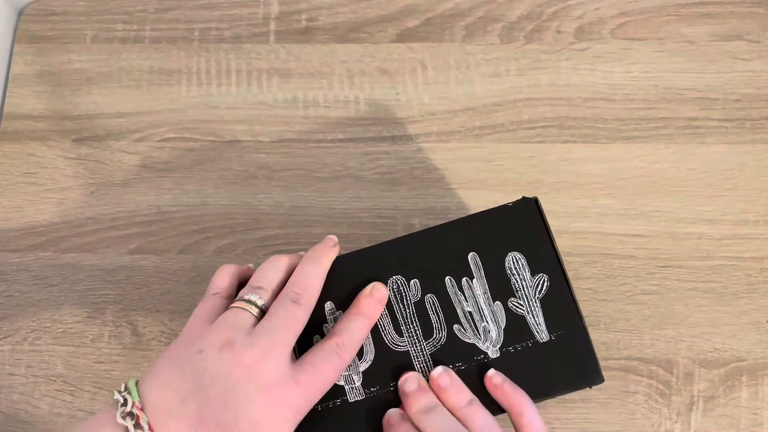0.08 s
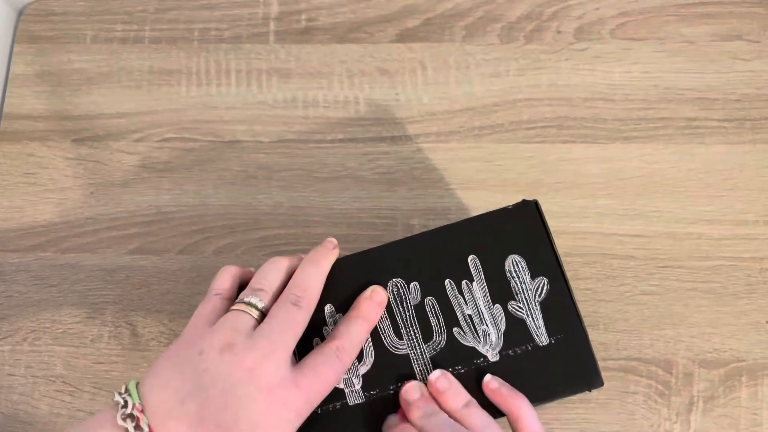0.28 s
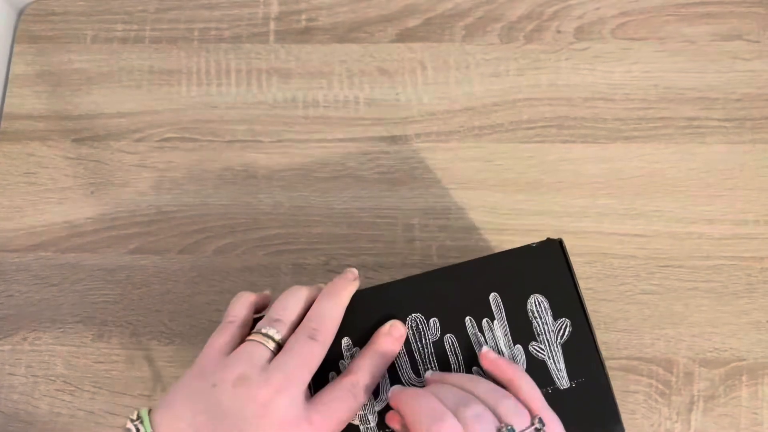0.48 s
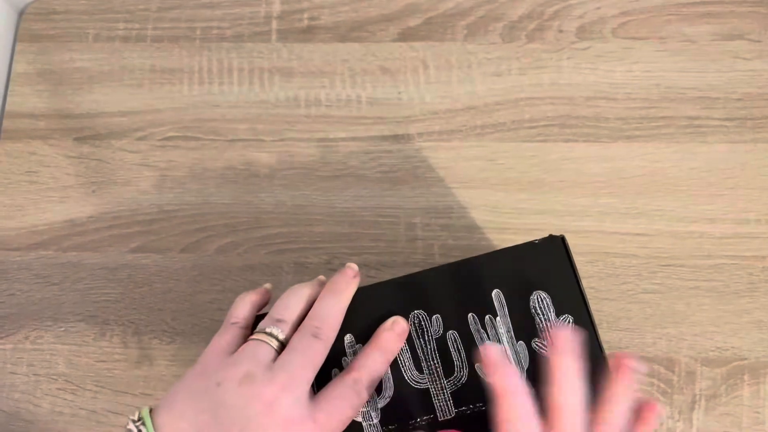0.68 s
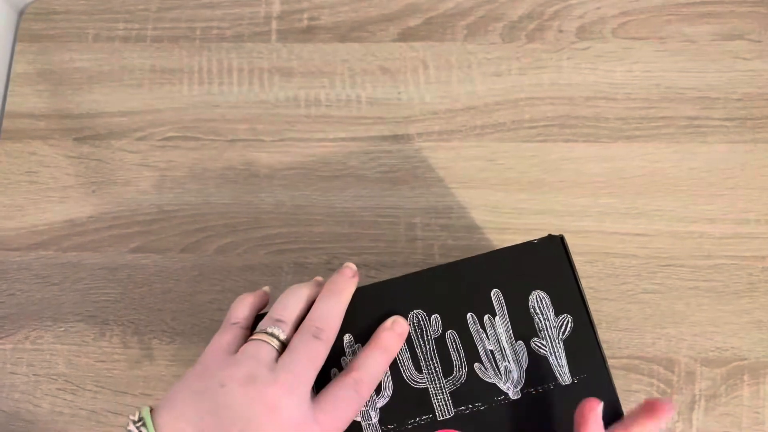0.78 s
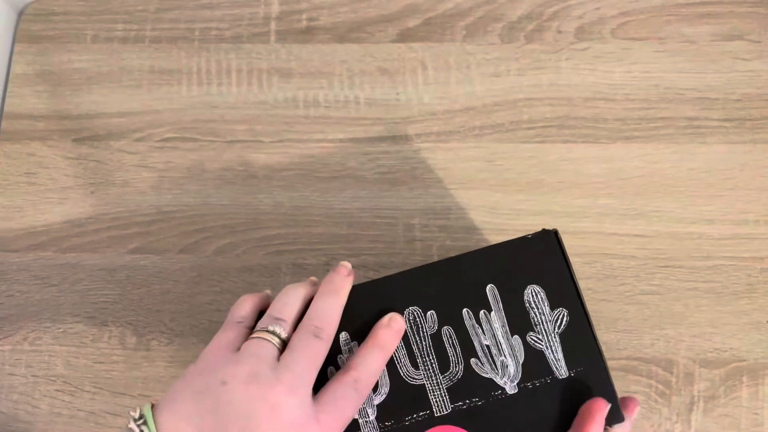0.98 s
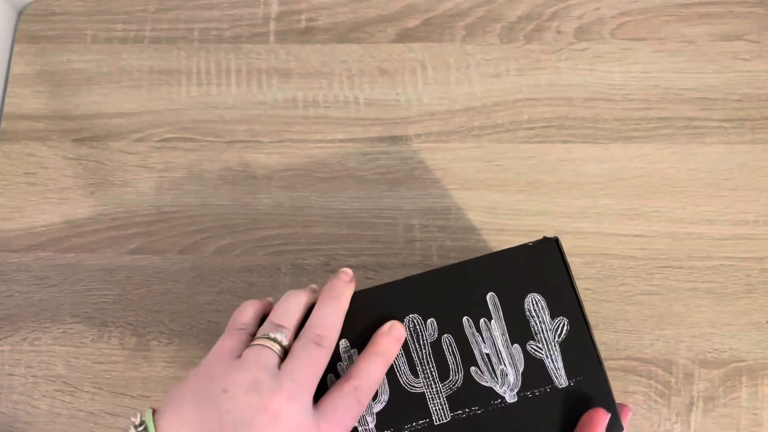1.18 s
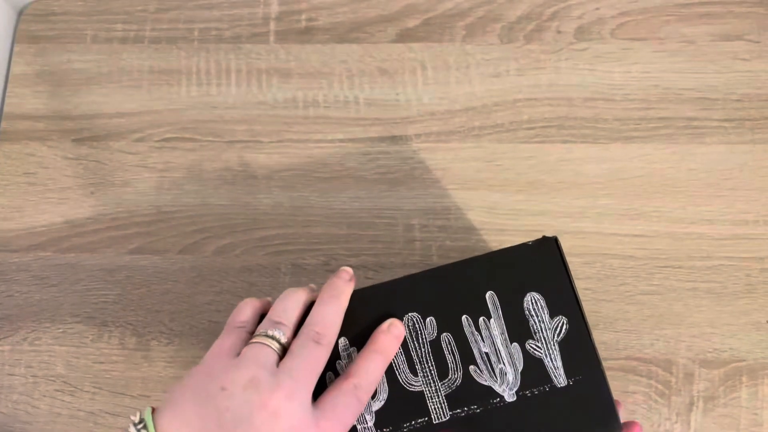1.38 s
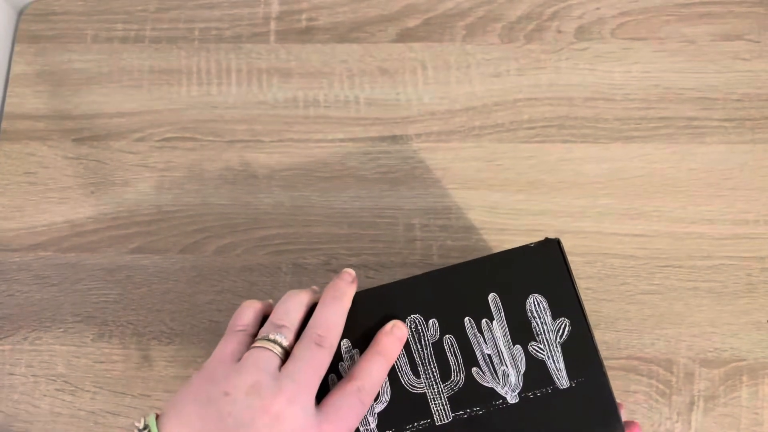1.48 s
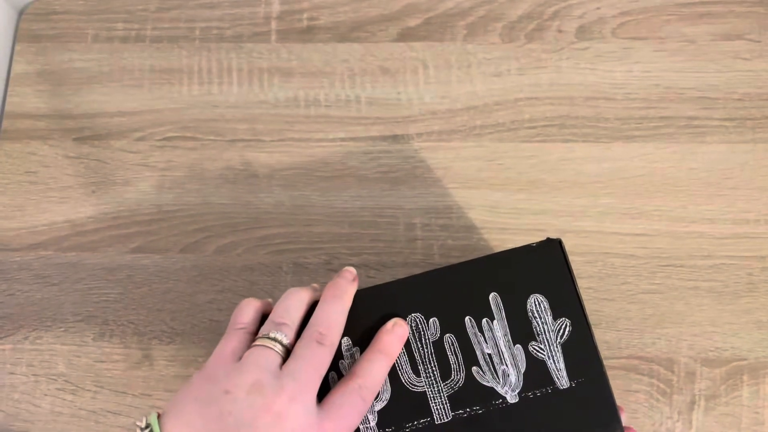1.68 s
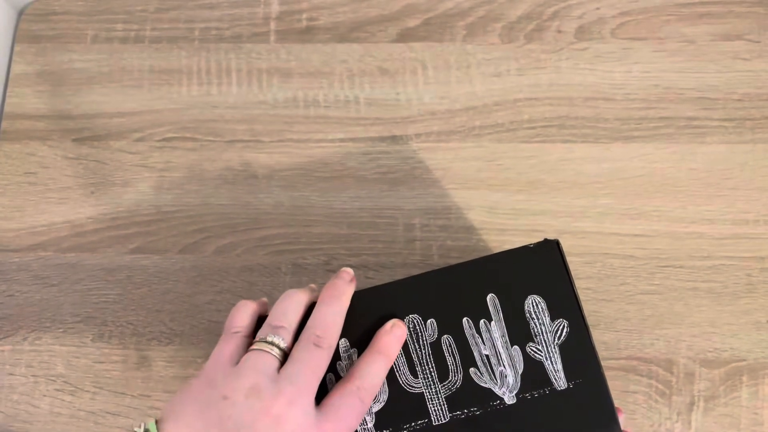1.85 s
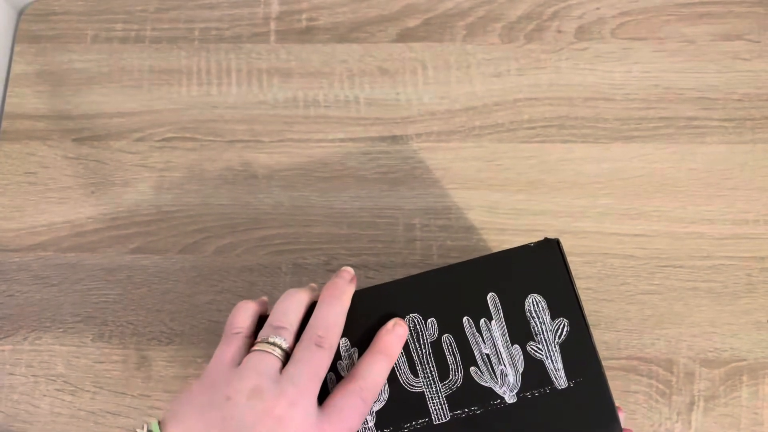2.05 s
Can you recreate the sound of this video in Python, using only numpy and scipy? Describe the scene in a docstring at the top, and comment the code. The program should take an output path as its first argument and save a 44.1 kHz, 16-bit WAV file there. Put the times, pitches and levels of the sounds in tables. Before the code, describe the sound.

Close up in a small room, a cardboard box lands on a wooden table with a single hollow thump. A softer bump and brief finger rubbing follow, then quiet runs of small snaps as a fingernail picks at a sticker.

```python
"""A small room, close to a wooden table where a hand shifts a cardboard box.
The box scuffs, drops with one thump and is bumped as the grip changes; box and table ring together.
Fingers slide over the card, then a nail picks at the sticker seal in runs of small snaps that ring
the hollow box. A close pair of microphone ports hears it over low room noise."""
import sys
import numpy as np
from scipy import signal
from scipy.fft import rfft, irfft, next_fast_len
from scipy.io import wavfile
from scipy.ndimage import map_coordinates

SR = 44100
rng = np.random.default_rng(int(sys.argv[2]) if len(sys.argv) > 2 else 0)


def dump(signal):
    """Clip the signal to [-1, 1] and save it as 16-bit WAV at the path in sys.argv[1]."""
    limited = np.clip(np.atleast_2d(signal).T, -1, 1)
    pcm = np.round(limited * 32767).astype(np.int16)
    wavfile.write(sys.argv[1], SR, pcm)


N = 92610

# The box lands and rattles: start_s, table_db, box_db, crack_db, sway_db
DROP_HITS = [(0.241, -17.5, -20.5, -15.5, -33), (.2478, -14.5, -25.5, -44, -27),
             (.2525, -38.5, -25.5, -36.5, -44.5), (.2600, -27.5, -31, -28.5, -48),
             (.2650, -48.5, -37, -31, -57.5)]
# Colour of the edge's crack: freq_hz, level_db
CRACK_EQ = [(150, -32), (600, -18), (790, 3), (900, -8.5), (1080, 8.5), (1500, 10), (1750, -10),
            (2100, -0.5), (2700, -14.5), (4500, -19), (8000, -19), (16000, -30.5)]
# Ring of the hollow box and of the table top: pitch_hz, level_db, t60_s
BOX_MODES = [(222.2, -5.5, 0.13), (297.6, -3.5, 0.18), (355.7, 1, 0.15), (415, -4.5, .05),
             (470.2, 1, 0.097), (511, -2.5, .08), (558.6, -4.5, 0.11), (621, -4.5, 0.091),
             (671.5, -2, 0.12), (778, -2, 0.098), (1010, -4, .035), (1161, -11.5, 0.025), (1400, -21, .045)]
TABLE_MODES = [(112.6, -1.5, 0.13), (146.9, 6.5, .15), (177.4, 7, 0.12), (188, -9.5, 0.38)]

def box_drop():
    """The box's edge cracks on the table, then its weight lands and the card rattles."""
    out = np.zeros(N)
    knock, boom = ring(TABLE_MODES, rise_s=.001, varied=False), table_sway()
    for start_s, table_db, box_db, crack_db, sway_db in DROP_HITS:
        add(out, start_s, amp(crack_db) * burst(CRACK_EQ, decay_s=.0031, grit=2.9))
        add(out, start_s, amp(box_db) * ring(BOX_MODES, rise_s=.00056))
        add(out, start_s, amp(table_db) * knock)
        add(out, start_s, amp(sway_db) * boom)
    return out

# The nail taps, catches and slips: start_s, box_db, snap_db, tick_db, fizz_db
NAIL_PICKS = [(0.0066, -51.5, -51, -49.5, -59), (0.0535, -60, -64, -79, -78),
              (0.1268, -50, -53.5, -56, -75.5), (0.144, -46.5, -63.5, -55, -71.5),
              (0.15, -44, -35.5, -40, -51.5), (0.1855, -40, -33, -29.5, -29.5),
              (0.1864, -31.5, -39.5, -45.5, -38.5), (0.2173, -41, -33, -50.5, -35.5),
              (0.4541, -50.5, -48, -63, -53.5), (0.5813, -68.5, -64.5, -60, -59),
              (0.5902, -78, -79, -61.5, -53), (0.6695, -60, -53, -71, -65),
              (0.6963, -63, -73, -55.5, -56.5), (0.7906, -49.5, -77, -40.5, -65.5),
              (0.8609, -60.5, -73, -78.5, -66), (0.8847, -56.5, -58.5, -77, -79),
              (0.9718, -48.5, -56.5, -60.5, -66.5), (1.009, -52.5, -62.5, -49, -73),
              (1.0408, -50, -68, -54.5, -68), (1.0689, -51.5, -73, -60.5, -74.5),
              (1.0991, -51, -62, -66, -72), (1.1211, -48.5, -59.5, -64, -73.5),
              (1.1674, -49, -55, -65, -72.5), (1.1838, -45.5, -61, -108, -64),
              (1.217, -59.5, -74, -80, -62.5), (1.2593, -51.5, -49.5, -64, -71.5),
              (1.337, -45, -54.5, -64, -74), (1.3517, -43.5, -53.5, -59, -71.5),
              (1.3663, -41, -50.5, -76, -69), (1.3797, -41.5, -53.5, -67.5, -78),
              (1.3953, -41.5, -56.5, -59, -76.5), (1.4144, -39.5, -37, -50, -62.5),
              (1.4328, -38, -44.5, -43, -59), (1.4574, -38.5, -45, -53, -59.5),
              (1.4911, -49, -40, -50, -56.5), (1.4953, -37.5, -64, -47.5, -73.5),
              (1.5362, -47.5, -55.5, -73, -65.5), (1.5505, -40.5, -45.5, -56.5, -70.5),
              (1.5782, -42, -47, -64, -65.5), (1.6012, -39, -49, -59.5, -74),
              (1.661, -57.5, -68, -91, -100), (1.7266, -45.5, -54.5, -64, -67),
              (1.7443, -45.5, -57.5, -66, -64.5), (1.761, -50, -67, -57.5, -67.5),
              (1.7648, -46.5, -53, -69, -67), (1.7868, -51, -58, -70, -70),
              (1.8668, -59.5, -71, -79.5, -78), (1.9237, -46, -41.5, -58, -88)]
# Colours of the mid snap, bright tick and top fizz: freq_hz, level_db
SNAP_EQ = [(200, -10.5), (600, -4.5), (920, -4), (1180, 6.5), (1500, -0.5), (1760, -7), (2080, 1.5),
           (2480, -21.5), (2720, -6), (3050, -10), (5000, -33), (16000, -54.5)]
TICK_EQ = [(500, -15), (2000, -3), (2750, 4.5), (3000, -5), (3500, 1), (4300, 2), (4750, -14.5),
           (5500, -3.5), (8000, -11), (11000, -10), (16000, -42)]
FIZZ_EQ = [(2000, -33.5), (7000, -7), (10000, -4), (13500, 6), (16000, -3)]

def nail_picking():
    """Each slip of the nail snaps, ticks and rings the box and a little of the table."""
    out = np.zeros(N)
    for start_s, box_db, snap_db, tick_db, fizz_db in NAIL_PICKS:
        add(out, start_s, amp(snap_db) * burst(SNAP_EQ, decay_s=.0013))
        add(out, start_s, amp(tick_db) * burst(TICK_EQ, decay_s=.0032))
        add(out, start_s, amp(fizz_db) * burst(FIZZ_EQ, decay_s=.0032))
        add(out, start_s, amp(box_db) * ring(BOX_MODES, rise_s=.00024))
        add(out, start_s, amp(box_db - 7.5) * ring(TABLE_MODES, rise_s=.0028))
    return out

# Soft thuds as the grip changes: start_s, table_db, box_db, sway_db
GRIP_BUMPS = [(.008, -51, -50.5, -51.5), (.189, -35, -39, -31.5), (0.2, -44, -39.5, -57),
              (.325, -41, -46.5, -32), (0.424, -40, -36.5, -50), (0.4363, -23.5, -39.5, -26.5),
              (0.466, -37.5, -40, -41), (.487, -32.5, -62, -27), (.523, -35.5, -63, -29),
              (0.545, -40.5, -85, -37.5), (.612, -49.5, -83, -37.5), (0.661, -56.5, -59, -64),
              (0.71, -71.5, -87, -41.5), (.790, -46.5, -53, -48), (1.268, -47.5, -52.5, -59),
              (1.297, -74, -53.5, -72), (1.791, -49.5, -46.5, -49.5), (1.974, -60, -76.5, -56.5)]

def fingertip_bumps(rise_s=.0059):
    """Fingertips press the box against the table: only the low modes answer."""
    out = np.zeros(N)
    thud, boom = ring(TABLE_MODES, rise_s, cutoff_hz=169.4, varied=False), table_sway()
    for start_s, table_db, box_db, sway_db in GRIP_BUMPS:
        add(out, start_s, amp(box_db) * ring(BOX_MODES, rise_s, cutoff_hz=378))
        add(out, start_s, amp(table_db) * thud)
        add(out, start_s, amp(sway_db) * boom)
    return out

# The table's bass weight: pitch_hz, level_db, t60_s
SWAY_MODES = [(47.5, -10, 0.083), (65.55, -1, 0.19)]

def table_sway():
    """The whole table sways with a deep boom, peak 1."""
    boom = ring(SWAY_MODES, rise_s=.011, varied=False)
    return boom / np.abs(boom).max()

# Skin dragging on card: start_s, length_s, rub_db, hiss_db
SKIN_SLIDES = [(.004, 0.004, -49.5, -51.5), (.160, 0.037, -45, -47.5), (0.179, 0.009, -54, -43),
               (0.193, 0.045, -43.5, -42), (0.23, 0.038, -32.5, -43.5), (0.274, 0.038, -41, -46.5),
               (0.292, 0.01, -57.5, -61), (0.362, 0.066, -43.5, -49.5), (0.438, 0.022, -60, -59),
               (0.508, 0.034, -65, -66), (0.54, .028, -55, -58), (0.637, 0.017, -68, -55),
               (0.668, 0.031, -67, -59), (0.693, 0.023, -60, -54.5), (0.774, 0.018, -55.5, -54),
               (0.793, 0.011, -52.5, -62), (.83, 0.11, -71.5, -79), (0.95, 0.053, -62.5, -70.5),
               (1.024, 0.033, -64.5, -63), (1.052, 0.097, -71, -72), (1.131, 0.098, -70, -68.5),
               (1.255, 0.042, -65.5, -69), (1.351, 0.24, -67.5, -76.5)]
# Light brushes over the smooth coating: start_s, length_s, level_db
COATING_BRUSHES = [(0.283, 0.014, -46), (0.526, 0.041, -51.5), (0.687, 0.017, -64), (1.189, 0.028, -60.5)]
# Colours of the slide's body and its hiss: freq_hz, level_db
RUB_EQ = [(80, -28), (350, 10), (800, -2), (1400, 4), (2100, 2), (2800, -2.5), (4200, -19), (6000, -20),
          (16000, -49.5)]
HISS_EQ = [(500, -26), (2000, -23.5), (4000, 6), (4900, 1), (6500, 0), (8000, 3), (11000, 1), (14000, 2.5),
           (16000, -9.5)]

def finger_slides(grain_db=1, grains_per_s=450):
    """Skin drags over the card in short strokes, grainy with tiny slips."""
    rub, hiss = sum(amp([[rub_db], [hiss_db]]) * stroke(start_s, length_s)
                    for start_s, length_s, rub_db, hiss_db in SKIN_SLIDES)
    brush = sum(amp(db) * stroke(start_s, length_s) for start_s, length_s, db in COATING_BRUSHES)
    slips = map_coordinates(rng.standard_normal(N // 8), [np.arange(N) / SR * grains_per_s])
    grain = unit_rms(amp(grain_db * slips))
    return grain * (rub * noise(RUB_EQ) + hiss * noise(HISS_EQ)) + brush * noise(FIZZ_EQ)

def stroke(start_s, length_s, rise_s=.01, fall_s=.0046):
    """Envelope of a finger that lands, slides for a while and lifts."""
    t = np.arange(N) / SR - start_s
    landing = np.clip(t / min(rise_s, length_s / 2), 0, 1)
    return landing * np.exp(-np.maximum(t - length_s, 0) / fall_s)

# Reverb decay: freq_hz, t60_s
REVERB_DECAY = [(60, 0.99), (300, 0.33), (1000, 0.18), (4000, 0.18), (9000, 0.42), (16000, 0.29)]
# Reverb send, and the width of its return: freq_hz, level_db
SEND_EQ = [(60, -15), (150, -23.5), (300, -18), (1000, -7), (4000, -7.5), (16000, -17.5)]
SIDE_EQ = [(60, -20), (150, -12), (400, 4.5), (1500, -3.5), (5000, 3), (10000, -8.5), (16000, -5)]

def room_reverb(x):
    """The room's answer: a short tail, centred in the bass and wider above."""
    hz, t, spectra = signal.stft(rng.standard_normal((2, SR // 2)), SR, nperseg=256)
    decay = amp(-60 * t / curve(REVERB_DECAY, hz)[:, None])
    tail = signal.istft(spectra * decay, SR, nperseg=256)[1]
    tail = np.pad(tail / np.linalg.norm(tail[0]), ((0, 0), (SR // 250, 0)))  # 4 ms pre-delay
    mid, side = signal.fftconvolve(equalise(x, SEND_EQ)[None], tail, axes=1)[:, :N]
    side = equalise(side, SIDE_EQ)
    return np.array([mid + side, mid - side])

# The room's low noise bed: freq_hz, level_db
AIR_EQ = [(20, -20.5), (35, -1), (52, 4.5), (90, -9), (150, 7), (220, -4), (400, -23), (1000, -31),
          (3000, -39.5), (8000, -50.5), (16000, -62.5)]

def room_tone(air_db=-59, hum_db=-75.5, hum_hz=858):
    """Low room noise with a faint steady tone."""
    return amp(air_db) * noise(AIR_EQ) + amp(hum_db) * np.sin(2 * np.pi * hum_hz * np.arange(N) / SR)

def burst(eq, decay_s, grit=.51, size=2048):
    """A sharp push with a gritty tail, carrying the energy of 5 ms at rms 1."""
    force = grit * rng.standard_normal(size) * np.exp(-np.arange(size) / SR / decay_s)
    force[0] += 1
    # Minimum-phase colour: nothing sounds ahead of the push.
    cepstrum = irfft(np.log(amp(curve(eq, np.fft.rfftfreq(size, 1 / SR)))))
    cepstrum[1:size // 2] *= 2
    cepstrum[size // 2 + 1:] = 0
    click = irfft(rfft(force) * np.exp(rfft(cepstrum)))
    return click / np.linalg.norm(click) * np.sqrt(.005 * SR)

def ring(modes, rise_s, cutoff_hz=None, varied=True):
    """Damped modes, rms 1 over the first 15 ms; varied ones mimic a random point of contact."""
    hz, db, t60 = np.transpose(modes)[:, :, None]
    t = np.arange(int(SR * t60.max())) / SR
    gain = amp(db)
    if varied:
        gain = gain * amp(rng.normal(0, 2, hz.shape)) * rng.choice([-1, 1], hz.shape)
        hz = hz * rng.normal(1, .012, hz.shape)
    if cutoff_hz:
        gain = gain / (1 + (hz / cutoff_hz) ** 10)
    partials = gain * np.exp(-np.log(1000) * t / t60) * np.sin(2 * np.pi * hz * t)
    body = partials.sum(0) * (1 - np.exp(-t / rise_s))
    return body / np.sqrt(np.mean(body[t < .015] ** 2))

def amp(db):
    return 10 ** (np.asarray(db) / 20)

def unit_rms(x):
    return x / np.sqrt(np.mean(x ** 2) + 1e-20)

def curve(points, hz):
    """Read (freq_hz, value) points along a log frequency axis."""
    freqs, values = np.transpose(points)
    return np.interp(np.log(hz + 1), np.log(freqs + 1), values)

def filtered(x, response):
    """Pass x through a complex frequency response."""
    size = next_fast_len(N + SR // 2)
    return irfft(rfft(x, size) * response(np.fft.rfftfreq(size, 1 / SR)), size)[..., :N]

def equalise(x, eq):
    return filtered(x, lambda hz: amp(curve(eq, hz)))

def noise(eq):
    """Coloured noise of rms 1."""
    return unit_rms(equalise(rng.standard_normal(N), eq))

def add(track, start_s, sound):
    i = max(0, round(start_s * SR))
    track[i:i + len(sound)] += sound[:max(0, N - i)]

def scene(slide_side_db=-21):
    """Box and room; the hands are close and wide, so some rubbing differs between the ports."""
    close = box_drop() + nail_picking() + fingertip_bumps() + finger_slides() + room_tone()
    return close + room_reverb(close) + amp(slide_side_db) * np.array([[1], [-1]]) * finger_slides()

# How far the left port leads the right: freq_hz, phase_rad
LEFT_LEAD = [(100, 0), (350, -.1), (900, -.33), (2000, .1), (4200, .55), (5600, .25), (7500, 1.7),
             (9400, 3.0), (11000, 3.25), (14500, 6.28)]
# Left port over right: freq_hz, level_db
LEFT_BALANCE = [(100, 0), (300, 1.3), (520, 2.5), (780, 0), (1100, 1), (4000, -.3), (4600, -1.5),
                (5500, .6), (16000, .2)]

def record(dry, low_cut_hz=38, high_cut_hz=15900):
    """The two ports differ in phase and level; deep bass and the top are cut."""
    def ports(hz):
        sides = np.array([[.5], [-.5]])
        balance = amp(sides * curve(LEFT_BALANCE, hz))
        phase = np.exp(1j * sides * curve(LEFT_LEAD, hz))
        return balance * phase / (1 + (hz / high_cut_hz) ** 200)
    low_cut = signal.butter(4, low_cut_hz, "high", fs=SR, output="sos")
    return filtered(signal.sosfilt(low_cut, dry), ports)

dry = scene()
out = record(dry)
dump(out)
```